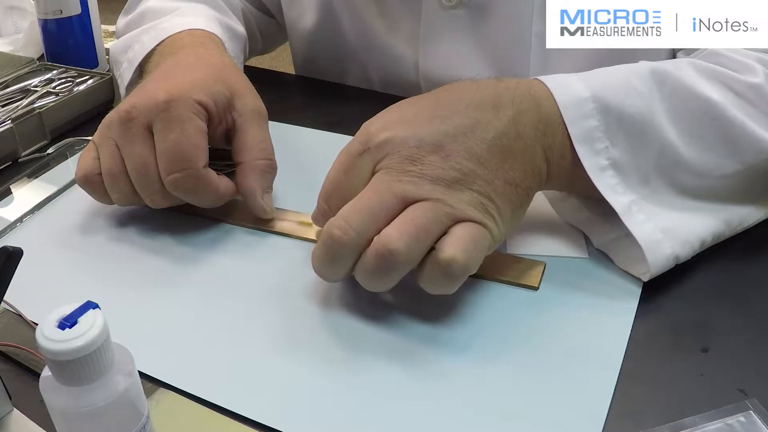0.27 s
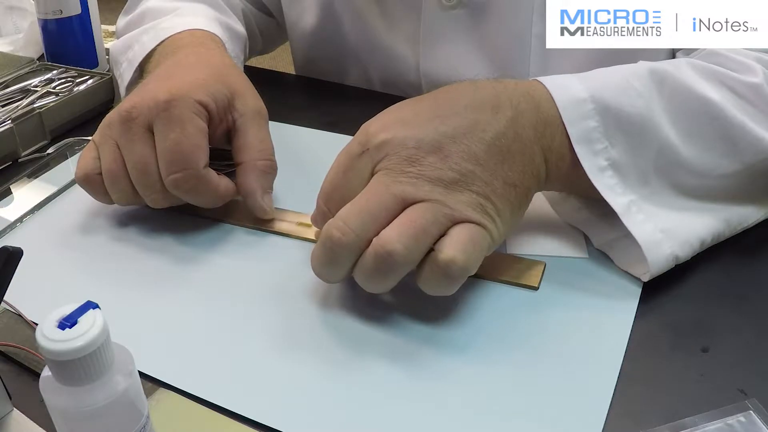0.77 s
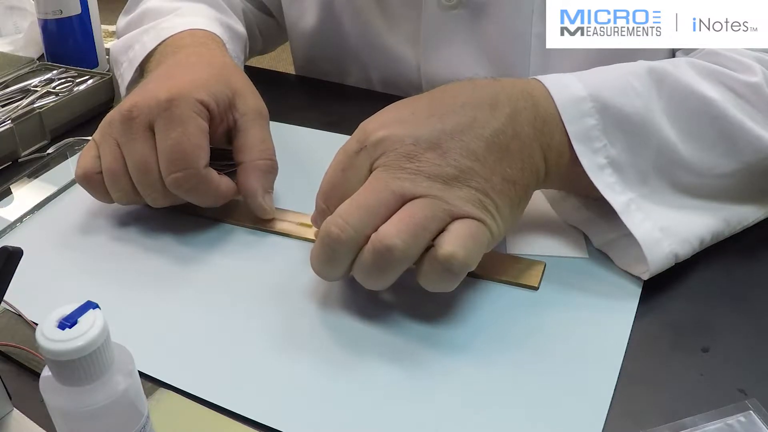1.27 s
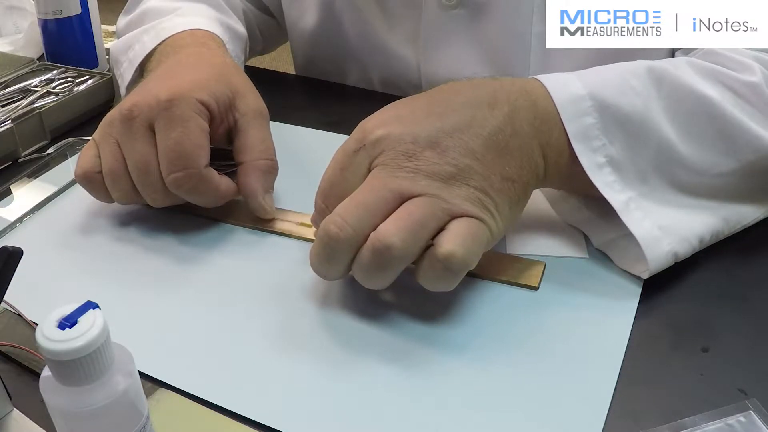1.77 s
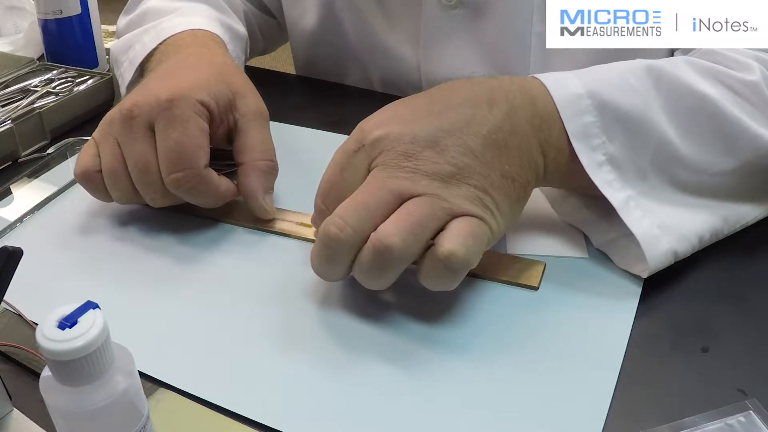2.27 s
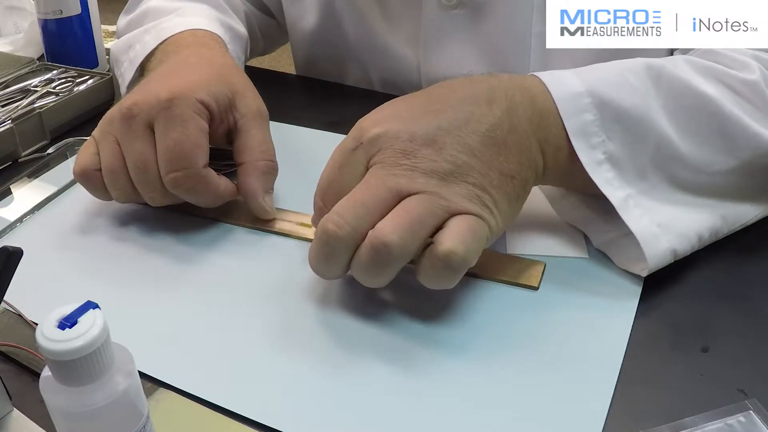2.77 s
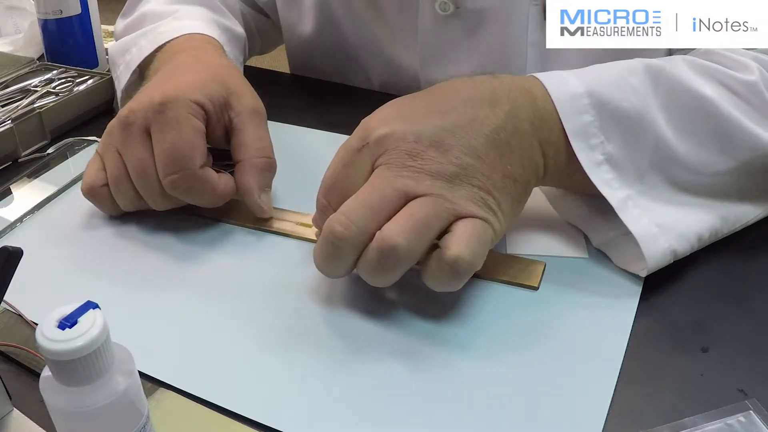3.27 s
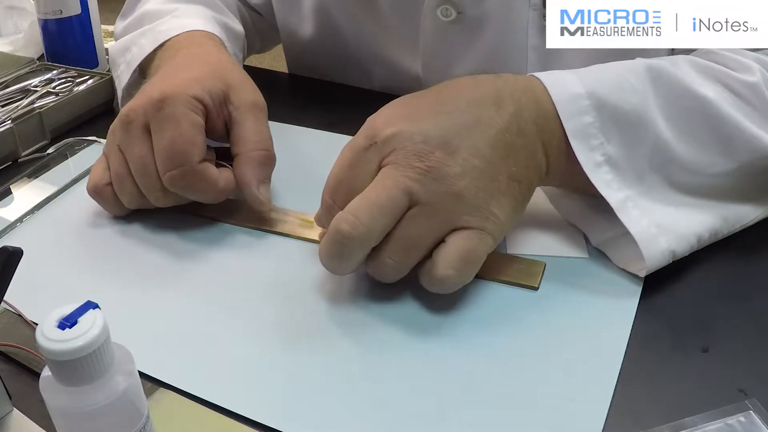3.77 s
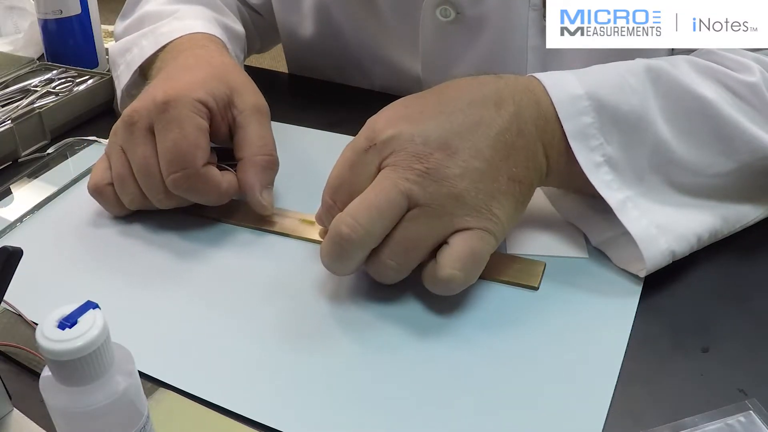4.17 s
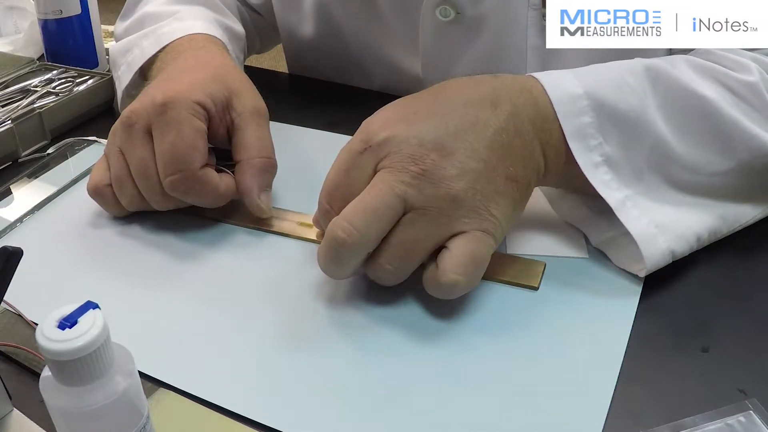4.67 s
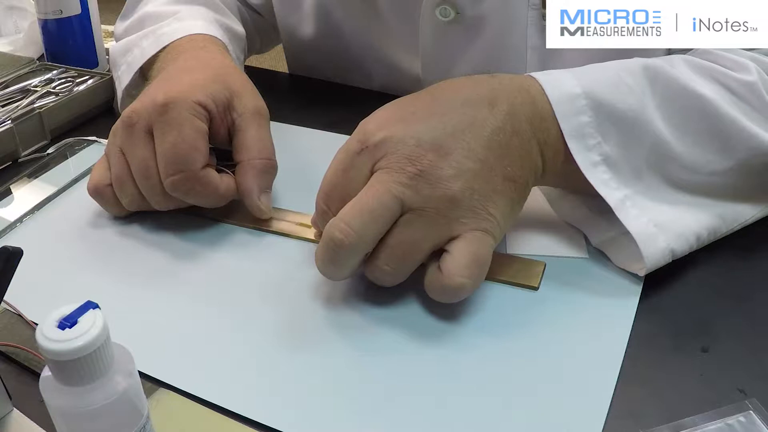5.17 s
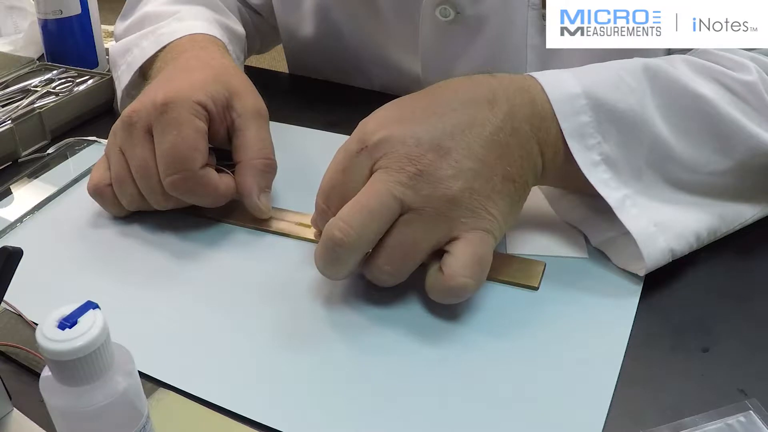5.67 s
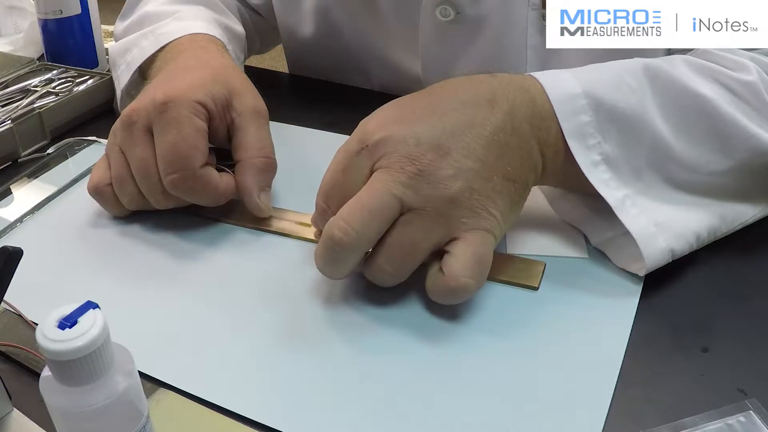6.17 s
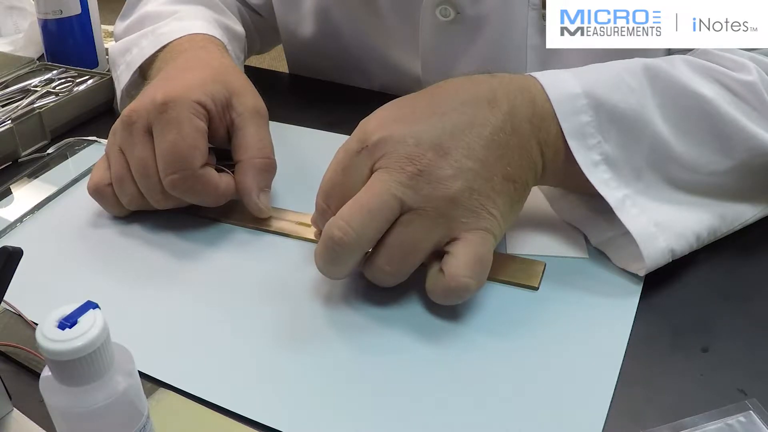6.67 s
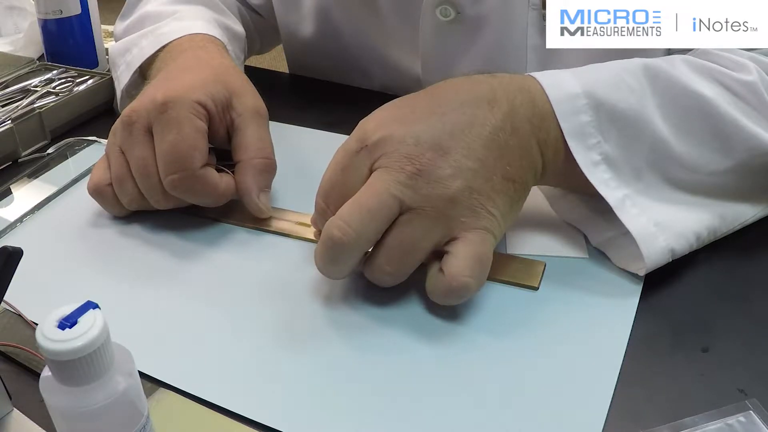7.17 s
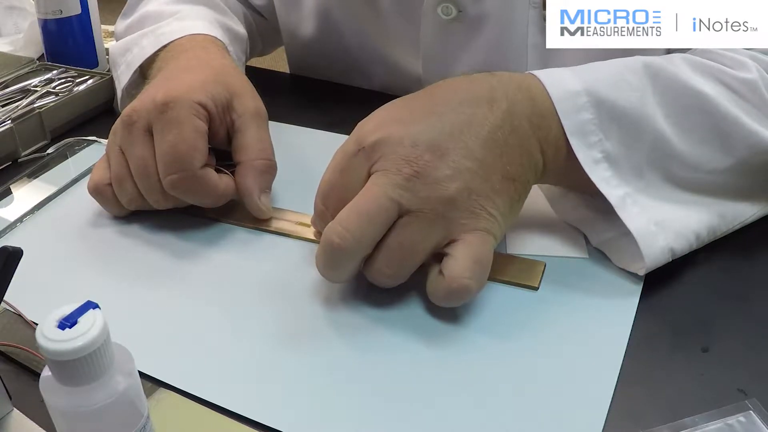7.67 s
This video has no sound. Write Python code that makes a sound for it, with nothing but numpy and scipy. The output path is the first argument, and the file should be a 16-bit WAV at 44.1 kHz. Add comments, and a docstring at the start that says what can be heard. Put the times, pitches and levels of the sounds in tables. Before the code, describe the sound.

A steady low ventilation rumble and mains hum fill a quiet workroom, with a few tiny dry ticks from a thin metal strip pressed on a bench.

```python
"""A low, steady ventilation rumble with fan tones and mains hum fills a quiet workroom; a supply whines faintly.
Two hands press a thin metal strip onto a bench: slips of the strip make small dry ticks.
Each slip is a snap and a burst of friction that excites damped modes, then a few reflections and a short tail.
Air noise is shaped random noise, motors and hum are wandering sines, and the whine is a frequency-modulated sine."""
import sys
import numpy as np
from scipy import signal
from scipy.fft import rfft, irfft
from scipy.io import wavfile

SR = 44100
rng = np.random.default_rng(int(sys.argv[2]) if len(sys.argv) > 2 else 0)


def log_audio(samples):
    """Write samples as a 16-bit WAV file to the path given in sys.argv[1]."""
    # one column per channel
    frames = np.atleast_2d(samples).T
    # limit to full scale, then quantise
    limited = np.clip(frames, -1, 1)
    pcm = np.round(limited * 32767).astype(np.int16)
    wavfile.write(sys.argv[1], SR, pcm)


N = 349578
TIME = np.arange(N) / SR  # seconds

# (time [s], level [dB], friction T60 [s], tilt [dB/octave], ring [Hz], ring width [Hz],
#  ring gain [dB], gain toward the room [dB])
SLIPS = [(0.4685, -61, .014, 0, 6400, 400, 20, -6), (3.47, -46, .022, 0, 5200, 1500, 0, -2),
         (3.4729, -25.5, 0.0086, 0, 12900, 1500, 23, 6), (3.4750, -38, 0.011, 2.5, 5500, 600, 4, 5),
         (3.7356, -23.5, 0.0083, -0.6, 4700, 500, 8.5, -0.5),
         (3.7373, -29.5, 0.0096, -1.5, 7650, 1200, 3, 1), (5.397, -43, 0.0089, 2, 4200, 900, -13, -2)]
# Resonances of the strip pressed on the bench: (frequency [Hz], width [Hz], gain before the tilt [dB])
STRIP_MODES = [(720, 370, -3.5), (1200, 320, -1), (2440, 600, -3), (4160, 380, -0.5), (4540, 340, -3),
               (5320, 610, 0), (7170, 620, -1.5), (7920, 380, 1.5), (9000, 690, 0), (10900, 850, -0.5),
               (13200, 600, -4.5), (14850, 400, -6)]
# Reflections off the nearest surfaces: (delay [s], gain [dB])
REFLECTIONS = [(0.0102, -12), (0.015, -21), (.0222, -21)]

# Basic switching pitch of the supply through one load cycle: (share of the cycle [0-1], frequency [Hz])
LOAD_CYCLE = [(.01, 11100), (.11, 10950), (.16, 10280), (.22, 10330), (.25, 11650), (.43, 11780),
              (.47, 12750), (.93, 12790)]
LOAD_RATE_HZ = 47.952
SLOW_LOAD_ON_S = 1.15  # one of the moments when the slow load switches on
LIGHT_EVERY, LIGHT_FIRST = 4, 1  # load cycles
HEAVY_EVERY, HEAVY_FIRST = 24, 7  # load cycles

# Mains hum: (multiple of the mains frequency [1], rms level [dB])
HUM = [(2, -50.5), (4, -60.5), (10, -69), (12, -74.5)]
MAINS_HZ = 59.98

# Air in the ducts, before the chance unevenness: (frequency [Hz], density [dB per Hz])
DUCT_AIR = [(19, -58.5), (31, -49), (41, -53.5), (49, -51.5), (56, -55), (66, -59), (78, -57), (90, -66.5),
            (100, -64), (119, -59.5), (142, -65), (265, -74.5), (320, -71), (390, -73.5), (470, -79),
            (600, -79), (830, -83), (885, -86), (990, -89), (1100, -95.5), (1700, -110), (5000, -140)]
# Fan and motor tones, before the chance unevenness: (frequency [Hz], rms level [dB], unsteadiness [0-1])
FAN_TONES = [(26.9, -42, .25), (36.3, -43.5, .4), (79.2, -49, .3), (113.6, -54, .4), (177.1, -60.5, .4),
             (236.2, -64, .4), (303, -66, .4), (314.8, -65, .4), (330.1, -53, .1), (386.1, -65, .4),
             (396.9, -59.5, .2), (587.6, -70, .5), (828.9, -74, .4), (837.1, -70.3, .3), (864.5, -69, .2),
             (913.3, -70, .25), (947.6, -77, .4), (974.5, -80, .4), (1895, -90.5, .8), (1951.3, -87.5, .7),
             (6160, -91.5, .8)]
# Chance unevenness of a steady deep rumble: (time [s], gain [dB])
RUMBLE_UNEVENNESS = [(0, 0.9), (1.15, -1.5), (1.6, -1), (2.15, 2.5), (2.8, -1), (3.9, -1), (4.7, 0.2),
                     (5.2, 0.5), (6.1, -1.1), (7.7, 0.1)]
# Hum of a blower: (time [s], rms level [dB])
BLOWER_LEVEL = [(0, -40), (3.2, -41.5), (4.6, -52), (5.6, -43.5), (7.4, -40)]
BLOWER_HZ = 59.0
# A motor's drone that swells midway and again near the end:
# (time [s], rms level of the fundamental [dB], rms level of its octave [dB])
DRONE_LEVELS = [(0, -47, -66), (3.0, -44, -59), (3.55, -40.5, -64), (3.85, -41, -44), (4.25, -39.5, -47),
                (4.6, -44, -53.5), (6.1, -48.5, -52.5), (6.9, -47.5, -49.5), (7.7, -40, -48.5)]
DRONE_HZ = 75.85

# Microphone hiss: (frequency [Hz], density [dB per Hz])
HISS = [(300, -103), (2000, -102.5), (4200, -105.3), (6000, -108.6), (8500, -113), (13000, -113.3),
        (14900, -117.5), (15600, -132)]
CUTOFF_HZ = 16200


def from_db(db):
    """Decibel law: 20 dB is a factor of ten in amplitude."""
    return 10 ** (np.asarray(db) / 20)


def rms_one(x):
    """Normalization to unit root mean square."""
    return x / np.sqrt(np.mean(np.abs(x) ** 2) + 1e-20)


def in_time(rows):
    """Linear interpolation of a (time, value) curve at every sample."""
    return np.interp(TIME, *np.transpose(rows))


def drift(rate_hz):
    """Low-passed random motion: smooth chance of rms 1, changing about rate_hz times a second."""
    step = 100  # samples between computed points
    settling = 2000  # points discarded
    pole = np.exp(-2 * np.pi * rate_hz * step / SR)
    chance = rng.standard_normal(N // step + 2 + settling)
    slow = signal.lfilter([1], [1, -2 * pole, pole * pole], chance)[settling:]
    return np.interp(np.arange(N) / step, np.arange(len(slow)), rms_one(slow))


def noise(spectrum, skirt_order=4):
    """Spectral shaping: white noise takes the given density, falling away below half the first frequency."""
    points_hz, density_db = np.transpose(spectrum)
    hz = np.arange(1, N // 2 + 2) * SR / N
    gain = from_db(np.interp(np.log(hz), np.log(points_hz), density_db))
    gain /= np.sqrt(1 + (points_hz[0] / 2 / hz) ** (2 * skirt_order))
    white = rfft(rng.standard_normal(N))
    return irfft(white * gain, N) * np.sqrt(SR / 2)


def resonance(x, hz, width_hz):
    """Damped oscillator: two poles, gain 1 at the peak, damping set by the width."""
    radius = np.exp(-np.pi * width_hz / SR)
    zeros = np.array([1, 0, -1]) * (1 - radius ** 2) / 2
    poles = [1, -2 * radius * np.cos(2 * np.pi * hz / SR), radius ** 2]
    return signal.lfilter(zeros, poles, x)


def tone(hz, unsteady, waver_hz=0.98):
    """Narrow-band modulation: a sine of rms about 1 whose strength and phase wander slowly."""
    share = np.clip(unsteady, 0, 1)
    phase = 2 * np.pi * (hz * TIME + rng.random())
    steady = np.sqrt(2 * (1 - share ** 2))
    in_phase = steady + share * drift(waver_hz)
    quadrature = share * drift(waver_hz)
    return in_phase * np.cos(phase) + quadrature * np.sin(phase)


def ticks(crack_db=-24, snap_db=10, ring_to_room=0.25, tilt_pivot_hz=5000):
    """Stick-slip excitation of damped modes: a snap, then friction dying in milliseconds.

    Returns the direct sound and what goes to the walls."""
    direct, outward = np.zeros(N), np.zeros(N)
    age = TIME[:SR // 20]
    for time_s, level_db, t60, tilt_db, ring_hz, ring_width_hz, ring_db, room_db in SLIPS:
        decay = from_db(-60 * age / t60)
        friction = rng.choice([-1, 1], len(age)) * decay
        slip = friction + from_db(snap_db) * (age == 0)
        body = from_db(crack_db) * slip
        for k, (hz, width_hz, mode_db) in enumerate(STRIP_MODES):
            polarity = (-1) ** k
            tilted_db = mode_db + tilt_db * np.log2(hz / tilt_pivot_hz)
            body = body + polarity * from_db(tilted_db) * resonance(slip, hz, width_hz)
        # the place of contact favours one range, which is beamed mostly forward
        ring = from_db(ring_db) * resonance(body, ring_hz, ring_width_hz)
        gain = from_db(level_db) * np.std(decay) / np.std(body + ring)
        start = round(time_s * SR)
        span = slice(start, start + len(age))
        direct[span] += gain * (body + ring)
        outward[span] += gain * from_db(room_db) * (body + ring_to_room * ring)
    return direct, outward


def room(x, tail_db=-20, t60=0.26, lowpass_hz=12000, tail_delay_s=0.016, boost_hz=2750, boost_db=8.5):
    """Room reverberation: distinct reflections, then a diffuse exponential tail, with more upper midrange."""
    x = x + from_db(boost_db) * resonance(x, boost_hz, width_hz=480)
    early = np.zeros(N)
    for delay_s, gain_db in REFLECTIONS:
        delay = round(delay_s * SR) / SR  # whole samples
        early += from_db(gain_db) * np.interp(TIME - delay, TIME, x, left=0)
    age = TIME[:SR // 2]
    tail = rng.standard_normal(len(age)) * from_db(-60 * age / t60) * (age > tail_delay_s)
    late = signal.fftconvolve(x, tail / np.linalg.norm(tail))[:N]
    lowpass = signal.butter(1, lowpass_hz, "low", fs=SR, output="sos")
    return signal.sosfilt(lowpass, early + from_db(tail_db) * late)


def supply_whine(level_db=-69.0, step_hz=200, jitter_hz=30, waver_hz=35, light_hz=360, light_db=-10.0,
                 light_share=0.05, heavy_hz=480, flicker_db=1.5):
    """Frequency modulation: a coil sings at a pitch set by a fast repeating load and one toggling each second."""
    cycles = TIME * LOAD_RATE_HZ
    number, share = cycles.astype(int), cycles % 1
    chance, depth = rng.random((number[-1] + 1, 2)).T
    second_half = share > .5
    half_weight = np.where(second_half, 1, .5)  # the first half of a cycle shifts half as far

    slow_load = np.sin(np.pi * (TIME - SLOW_LOAD_ON_S)) > 0
    hz = np.interp(share, *np.transpose(LOAD_CYCLE), period=1)
    hz = hz + step_hz * slow_load * half_weight

    # lightly loaded cycles, regular ones and a few stray ones, run higher and fainter
    light = (number % LIGHT_EVERY == LIGHT_FIRST) | (chance[number] < light_share)
    relief = light * 2 * depth[number] * half_weight
    # heavy cycles sag in their second half
    heavy = (number % HEAVY_EVERY == HEAVY_FIRST) & second_half
    hz = hz + light_hz * relief - heavy_hz * heavy
    hz = hz + jitter_hz * drift(100) + waver_hz * drift(25)

    # the whine is stronger at its lower pitches
    pitch_strength = (hz.mean() / hz) ** 1.9
    change_db = light_db * relief * second_half + flicker_db * drift(24)
    strength = rms_one(pitch_strength * from_db(change_db))
    sine = np.sqrt(2) * np.sin(2 * np.pi * np.cumsum(hz) / SR)
    return from_db(level_db) * strength * sine


def mains():
    """Even-harmonic vibration: transformers hum on even multiples of the mains frequency."""
    return sum(from_db(db) * tone(round(multiple) * MAINS_HZ, unsteady=.1) for multiple, db in HUM)


def ventilation(deep_below_hz=130):
    """Flow noise plus rotational tones: a steady rumble, its deep part uneven by chance, a blower and a drone."""
    air = noise(DUCT_AIR)
    for hz, db, unsteady in FAN_TONES:
        air = air + from_db(db) * tone(hz, unsteady)
    lowpass = signal.butter(2, deep_below_hz, fs=SR, output="sos")
    deep = signal.sosfiltfilt(lowpass, air)  # zero phase, so it subtracts cleanly
    uneven_air = air - deep + deep * from_db(in_time(RUMBLE_UNEVENNESS))

    blower = from_db(in_time(BLOWER_LEVEL)) * tone(BLOWER_HZ, unsteady=.1)
    drone = np.zeros(N)
    for harmonic in (1, 2):
        level_db = in_time(np.array(DRONE_LEVELS)[:, [0, harmonic]])
        drone += from_db(level_db) * tone(harmonic * DRONE_HZ, unsteady=.1)
    return uneven_air + blower + drone


def scene():
    """Superposition: the direct ticks and their room sound add to the steady background."""
    direct, outward = ticks()
    background = ventilation() + mains() + supply_whine() + noise(HISS)
    return (background + direct + room(outward))[None]


def record(dry):
    """Band limiting: an elliptic low-pass cuts the top steeply."""
    lowpass = signal.ellip(10, .1, 80, CUTOFF_HZ, fs=SR, output="sos")  # ripple .1 dB, stopband 80 dB
    return signal.sosfilt(lowpass, dry)


dry = scene()
out = record(dry)
log_audio(out)
```